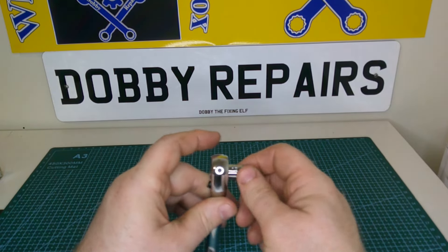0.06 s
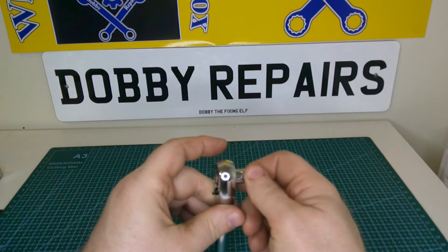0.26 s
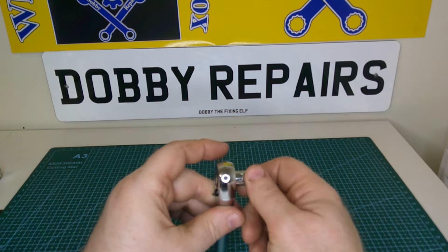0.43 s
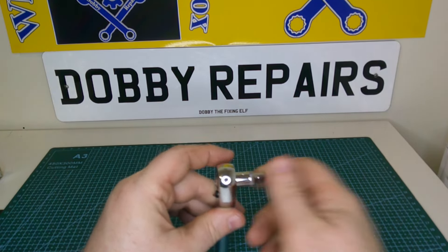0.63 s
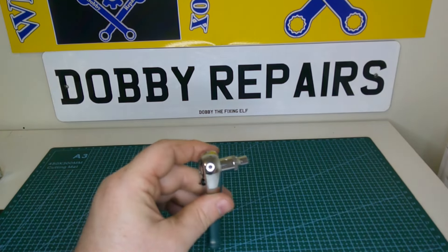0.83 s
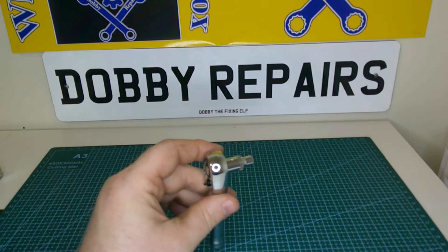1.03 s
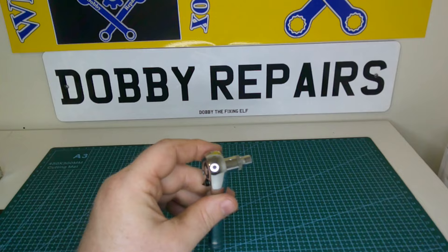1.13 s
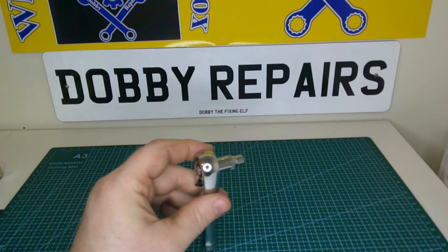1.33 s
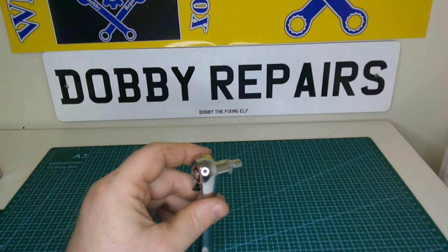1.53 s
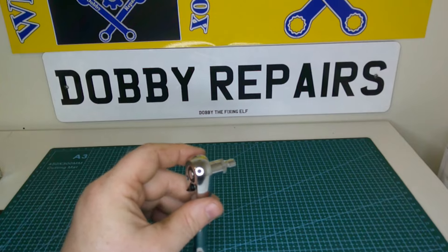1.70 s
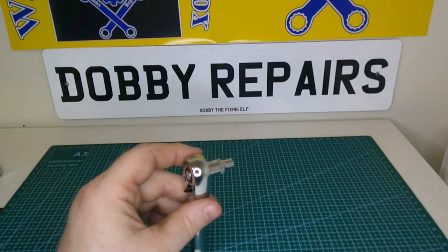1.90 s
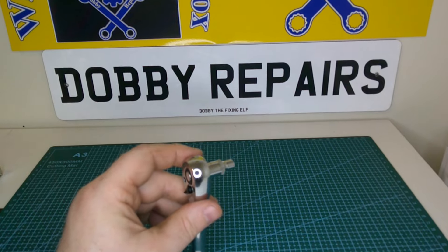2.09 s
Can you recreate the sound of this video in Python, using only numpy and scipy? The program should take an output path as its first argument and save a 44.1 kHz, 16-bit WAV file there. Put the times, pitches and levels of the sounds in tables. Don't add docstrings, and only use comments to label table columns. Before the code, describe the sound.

A small steel ratchet clicks close to a camera microphone in a quiet room. After faint room air, a tight burst of four bright, chattering clicks comes at 0.24-0.28 s, then a slightly louder one at 0.46-0.51 s, with short metallic ring and faint echo. A weak click follows at 0.62, soft rubbing peaks near 0.72, and light finger taps and scuffs come at 1.3-1.8 s. Highs are dulled at the very top.

```python
import sys
import numpy as np
from scipy import signal
from scipy.fft import rfft, irfft, next_fast_len
from scipy.io import wavfile
from scipy.ndimage import uniform_filter1d

SR = 44100
rng = np.random.default_rng(int(sys.argv[2]) if len(sys.argv) > 2 else 0)


def inscribe(sig):
    pcm = np.round(np.clip(np.atleast_2d(sig).T, -1, 1) * 32767)
    wavfile.write(sys.argv[1], SR, pcm.astype(np.int16))


def invert_db(x):
    u = np.asarray(x, float) / 20
    return 10 ** u


N = 94815


def ratchet():
    # start_s, snap_db, snap_pitch_hz, head_over_snap_db, knock_over_snap_db
    contacts = [(0.2361, -10, 7750, -6.5, 3.5), (0.2382, -22.5, 7800, 11.5, -1),
                (.2495, -13.5, 7850, -5, 8), (0.2514, -18, 7700, 6, -19), (0.254, -20.5, 7900, -14.5, 7.5),
                (0.263, -12.5, 7600, 0, 4.5), (0.2628, -15, 7600, -7, -7), (0.2653, -22, 7500, -9, 1),
                (.2777, -15, 7600, 0, 4), (0.2795, -12, 7550, -8, -2), (0.3562, -41, 7500, -7, -5),
                (0.4583, -11.5, 7800, -9, 1), (.4600, -9.5, 7800, -11, -4), (.4613, -12, 7800, -18, -4),
                (.4637, -13.5, 7750, -0.5, 3), (0.467, -28, 7300, -3, -7), (0.478, -10, 7900, -7, 6.5),
                (.4798, -9.5, 7800, -4, -27), (.4884, -12, 7900, 0, 1), (.4907, -22.5, 7900, -16, 8),
                (0.5093, -6.5, 7800, -5.5, 3.5), (.5120, -18, 7900, 3, 0.5), (0.6197, -26.5, 7300, 2, 14.5),
                (0.622, -28, 7500, -7, 2)]
    # ratio_to_snap_pitch, level_db, t60_s
    pawl_modes = [(.905, -24.5, .013), (.955, -13, 0.015), (1, 0, 0.0074), (1.035, -13, 0.0086),
                  (1.07, -9, 0.0056)]
    # pitch_hz, level_db, t60_s
    head_modes = [(3695, -29, 0.027), (4370, -26.5, 0.014), (5370, -18.5, 0.023), (5890, -27, 0.023),
                  (6033, -10.5, .036), (6450, -33, .022), (6950, -18.5, 0.024)]
    # freq_hz, density_db
    knock_colour = [(120, -26.5), (400, 0.5), (1100, -1), (2000, -4), (3500, -0.5), (5000, -3.5),
                    (6500, -11), (9000, -9.5)]
    # freq_hz, density_db
    wall_colour = [(600, -35), (4800, -28.5), (5500, -20.5), (6100, -0.5), (6600, -14), (7600, -2.5),
                   (8300, -12), (9000, -15.5)]
    knock_base_db, knock_t60_s = -22, 0.0078
    pawl_attack_s, head_attack_s = 0.00036, 0.00054

    rows = np.zeros((3, N + SR))
    t = np.arange(SR // 8) / SR
    attack_s = np.array([[pawl_attack_s], [head_attack_s], [pawl_attack_s]])
    rise = 1 - np.exp(-(t / attack_s) ** 2)
    for start_s, snap_db, pitch_hz, head_db, knock_db in contacts:
        snap = 1.34 * ring(pawl_modes, t, detune=0.0073, pitch=pitch_hz)
        snap = snap + invert_db(knock_base_db + knock_db) * puff(knock_colour, knock_t60_s, t)
        head = invert_db(head_db) * ring(head_modes, t, detune=0.0015)
        blow = puff(wall_colour, knock_t60_s, t)
        first = round(start_s * SR)
        rows[:, first:first + len(t)] += invert_db(snap_db) * rise * [snap, head, blow]
    return rows[:, :N]


def ring(modes, t, detune, pitch=1):
    scatter_db = 1.5
    hz, db, t60 = np.transpose(modes)[:, :, None]
    size, tune = rng.standard_normal((2, len(modes), 1))
    decay = invert_db(db + scatter_db * size - 60 * t / t60)
    tone = np.sin(2 * np.pi * pitch * hz * (1 + detune * tune) * t)
    return np.sum(decay * tone, axis=0)


def puff(spectrum, t60, t):
    return unit(coloured(rng.standard_normal(len(t)), spectrum)) * invert_db(-60 * t / t60)


def room(x):
    # freq_hz, t60_s
    decay_times = [(500, .2), (4000, 0.6), (6000, 0.31), (8000, 0.27)]
    hz, t, z = signal.stft(rng.standard_normal(SR // 2), SR, nperseg=256)
    fade = invert_db(-60 * t / along(decay_times, hz)[:, None])
    tail = signal.istft(z * fade, SR, nperseg=256)[1]
    late = np.pad(x, (150, 0))
    return signal.fftconvolve(late, tail / np.linalg.norm(tail))[:N]


def hands():
    # start_s, dull_db, bright_db, rise_s, t60_s
    taps = [
        (1.289, -70, -52, 0.042, 0.4),
        (1.3827, -47.5, -40.5, .0003, 0.014),
        (1.696, -54, -65, .004, 0.41),
        (1.735, -58, -48.5, .0004, .015),
        (1.82, -77, -58, .025, 0.14),
    ]
    # freq_hz, density_db
    dull_colour = [(300, -27), (800, -6), (1300, -2), (2000, -3), (3000, -23)]
    # freq_hz, density_db
    bright_colour = [(1500, -20), (3000, 0), (4500, 3), (6000, -4), (7500, 3), (9000, -8)]
    # time_s, level_db
    rub_levels = [(0, -93), (0.449, -64), (.56, -59), (.64, -50), (0.722, -46.5), (.77, -63), (.93, -58),
                  (1.1, -67), (1.25, -63), (1.38, -56), (1.55, -59), (1.7, -62.5), (1.8, -61.5),
                  (1.85, -57.5), (1.92, -63.5), (2.0, -60.5), (2.05, -55.5), (2.15, -58.5)]
    # freq_hz, density_db
    skin_colour = [(400, -32), (800, -8.5), (2200, -1), (3000, -6.5), (3700, -3), (4700, -15.5),
                   (7200, 1.5), (9000, -10.5)]

    out = np.zeros(N + SR)
    t = np.arange(SR // 4) / SR
    for start_s, dull_db, bright_db, rise_s, t60_s in taps:
        dull = invert_db(dull_db) * puff(dull_colour, t60_s, t)
        bright = invert_db(bright_db) * puff(bright_colour, t60_s, t)
        first = round(start_s * SR)
        out[first:first + len(t)] += (dull + bright) * (1 - np.exp(-(t / rise_s) ** 2))
    time_s, level_db = np.transpose(rub_levels)
    rub_gain = invert_db(np.interp(np.arange(N) / SR, time_s, level_db))
    return out[:N] + rub_gain * rush(skin_colour, patchy_db=1.0)


def air():
    # freq_hz, density_db
    air_colour = [(18, -9), (60, -5.5), (160, -5.5), (700, -23), (2100, -29), (5100, -40.5), (7600, -37.5),
                  (9000, -49.5)]
    return invert_db(-49) * rush(air_colour, patchy_db=1.1)


def rush(spectrum, patchy_db):
    z = signal.stft(rng.standard_normal(N), nperseg=512)[2]
    field = uniform_filter1d(rng.standard_normal(z.shape), size=6, axis=0)
    field = uniform_filter1d(field, size=8, axis=1)
    noise = signal.istft(z * invert_db(patchy_db * unit(field)), nperseg=512)[1][:N]
    return unit(coloured(noise, spectrum))


def unit(x):
    return x / np.sqrt(np.mean(x ** 2) + 1e-20)


def along(points, hz):
    f, v = np.transpose(points)
    return np.interp(np.log(hz + 1), np.log(f + 1), v)


def coloured(x, spectrum):
    m = next_fast_len(x.shape[-1] + 8192)
    gain = invert_db(along(spectrum, np.fft.rfftfreq(m, 1 / SR)))
    return irfft(rfft(x, m) * gain, m)[..., :x.shape[-1]]


def causal(x, spectrum):
    m = 2 * next_fast_len(N)
    log_gain = np.log(invert_db(along(spectrum, np.fft.rfftfreq(m, 1 / SR))))
    cepstrum = irfft(log_gain, m)
    cepstrum[1:m // 2] *= 2
    cepstrum[m // 2 + 1:] = 0
    return irfft(rfft(x, m) * np.exp(rfft(cepstrum)), m)[..., :N]


def scene():
    room_db, head_to_walls_db = -12.5, -12
    snap, head, blow = ratchet()
    echo = invert_db(room_db) * room(blow + invert_db(head_to_walls_db) * head)
    return (snap + head + echo + hands() + air())[None]


def top_cut(x):
    return signal.sosfilt(signal.butter(12, 9530, fs=SR, output="sos"), x)


def record(dry):
    # freq_hz, gain_db
    band_edge = [(8300, 1), (8700, -17), (9100, -28.5), (9600, -49), (16000, -83)]
    mix = causal(dry, band_edge)
    return top_cut(mix)


dry = scene()
out = record(dry)
inscribe(out)
```